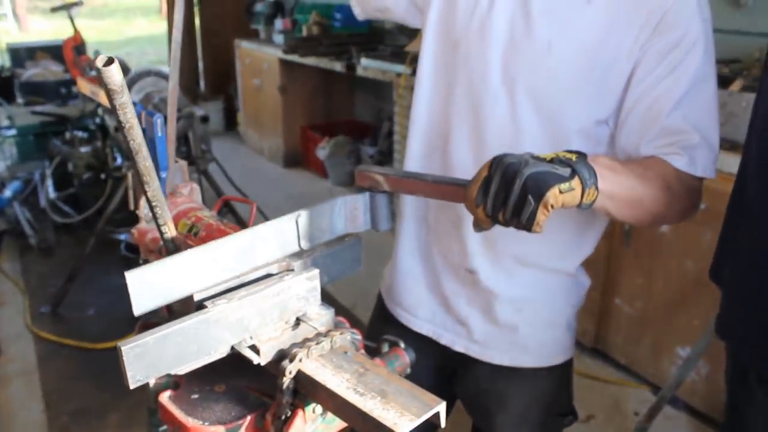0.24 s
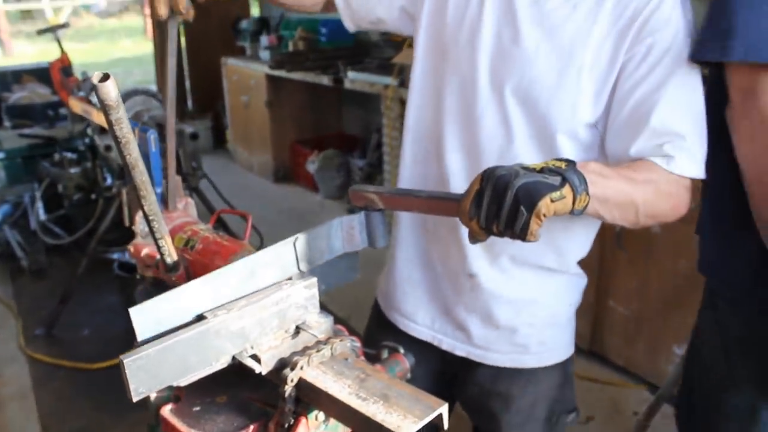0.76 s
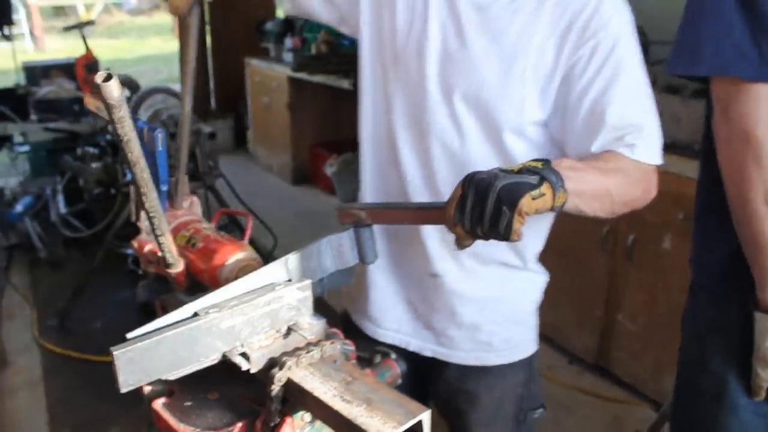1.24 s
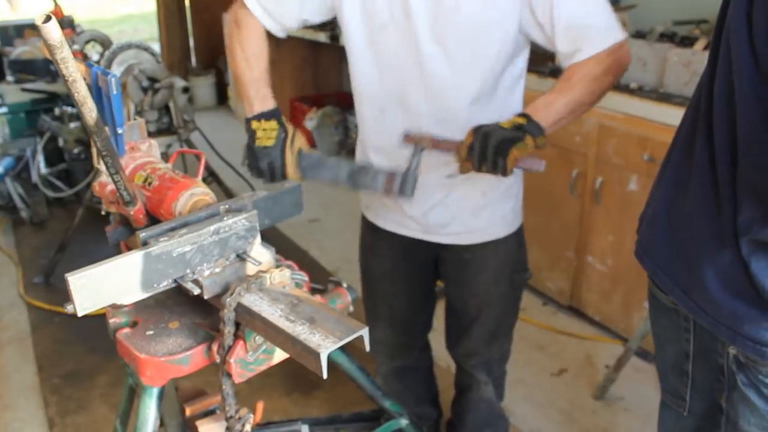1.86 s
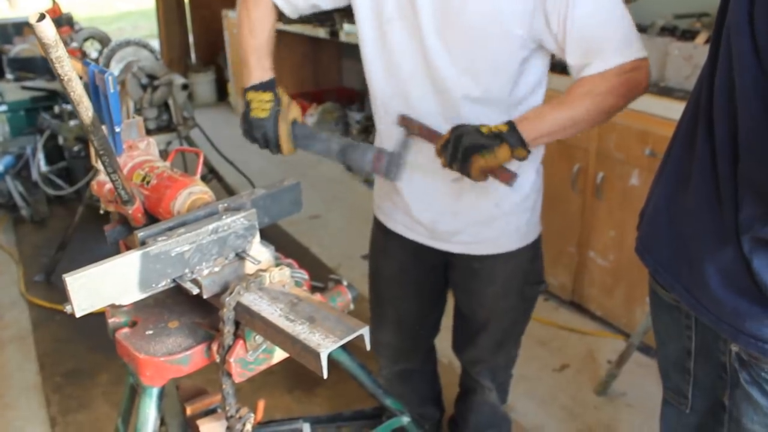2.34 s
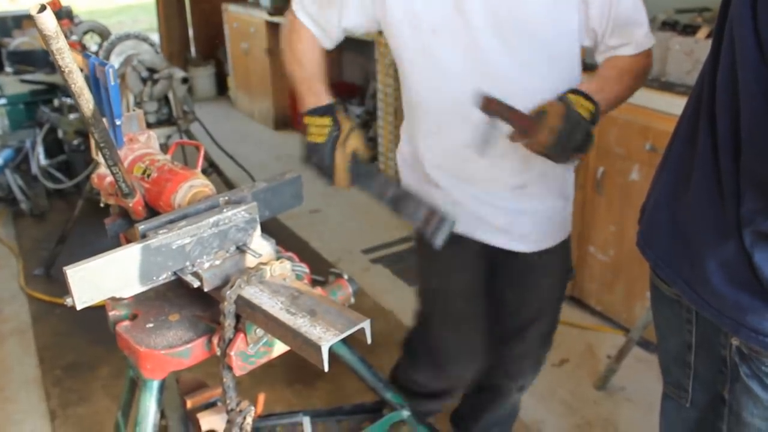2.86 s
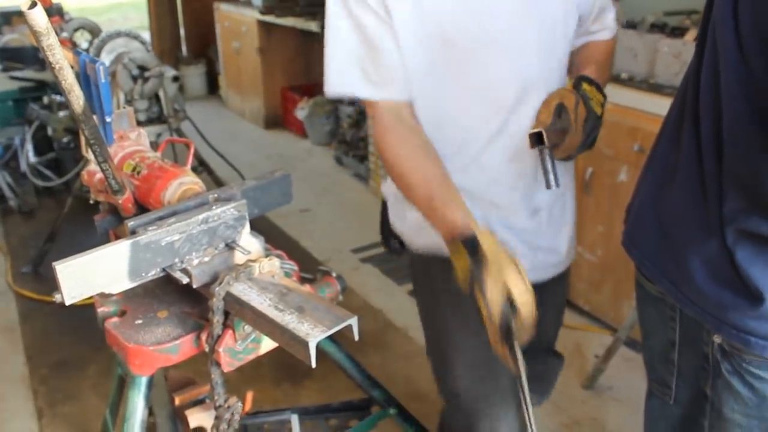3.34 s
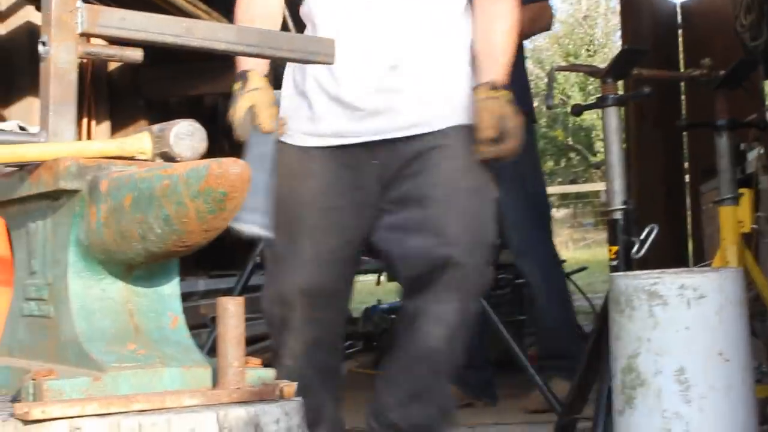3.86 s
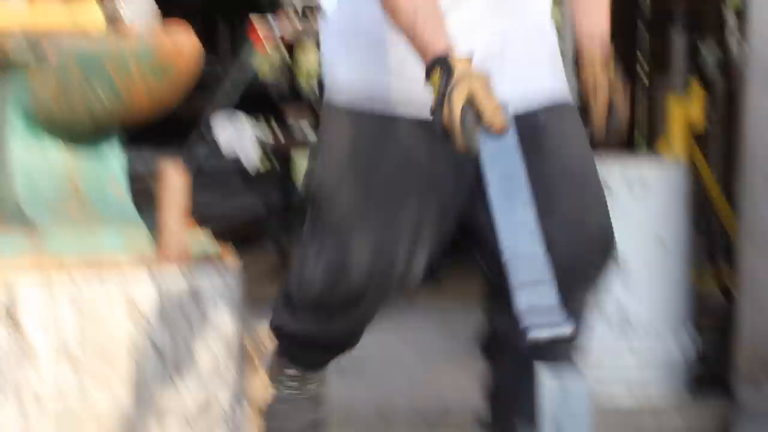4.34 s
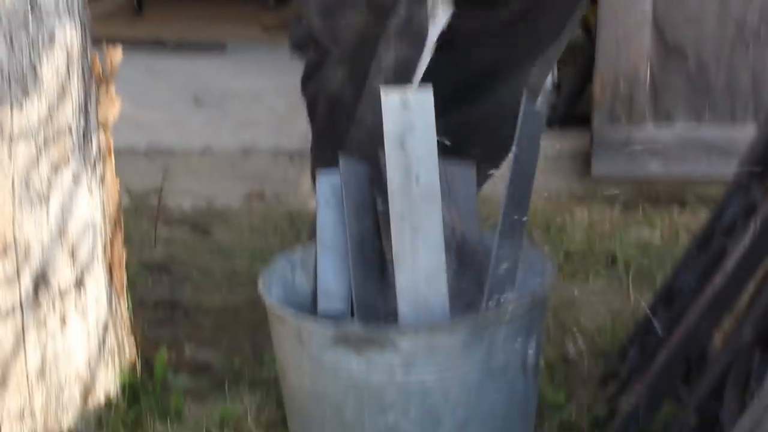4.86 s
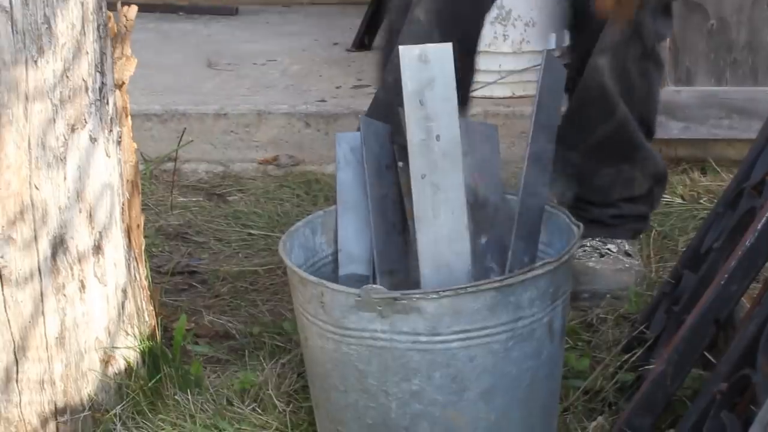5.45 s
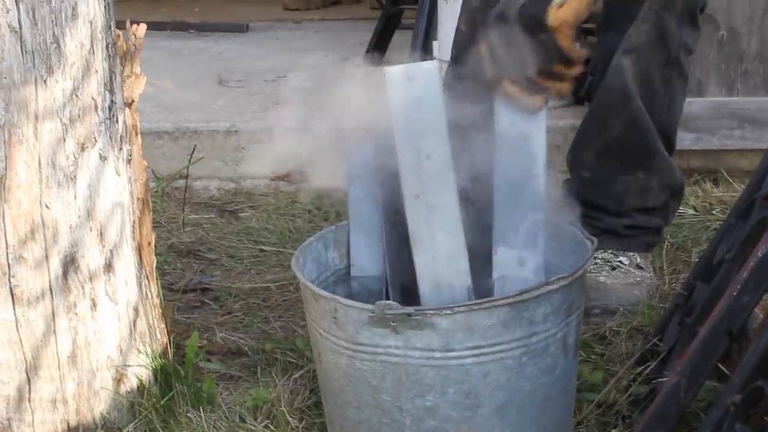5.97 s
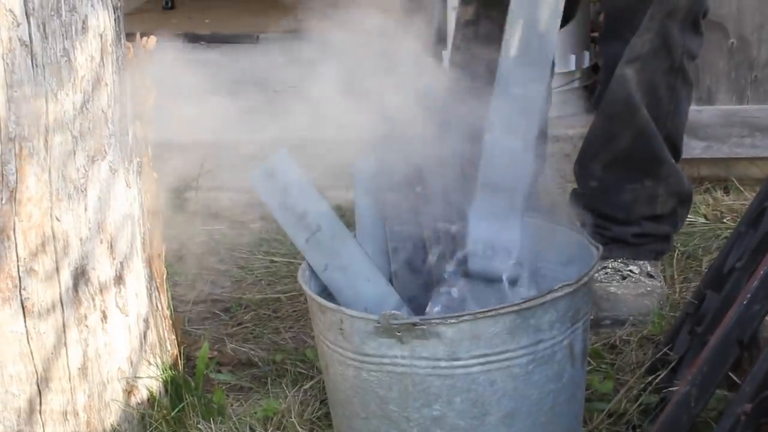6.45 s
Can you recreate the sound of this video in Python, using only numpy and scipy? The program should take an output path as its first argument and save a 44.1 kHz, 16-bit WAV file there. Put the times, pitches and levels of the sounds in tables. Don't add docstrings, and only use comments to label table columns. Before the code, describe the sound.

Loud steady burner roar stops dead, cloth and soles rustle, hot metal knocks into a bucket and boils fiercely, then a quiet yard with insects.

```python
import sys
import numpy as np
from scipy import signal
from scipy.fft import rfft, irfft
from scipy.io import wavfile

SR = 44100
rng = np.random.default_rng(int(sys.argv[2]) if len(sys.argv) > 2 else 0)


def wav_record(signal):
    frames = np.transpose(np.atleast_2d(signal))
    bounded = np.clip(frames, -1, 1)
    quanta = np.round(bounded * 32767).astype(np.int16)
    wavfile.write(sys.argv[1], SR, quanta)


def ratio_of_db(decibels):
    return 10 ** (np.asarray(decibels, float) / 20)


N = 295470
T = np.arange(N) / SR
HZ = np.maximum(np.arange(N // 2 + 1) * SR / N, 1)
FORGE_END_S, PLUNGE_S, QUENCH_END_S = 1.043, 2.162, 5.5135


def rms_one(x):
    return x / np.sqrt(np.mean(x ** 2) + 1e-20)


def white():
    return rng.standard_normal(N)


def high_pass(x, order, hz):
    return signal.sosfilt(signal.butter(order, hz, "high", fs=SR, output="sos"), x)


def drift(rate_hz):
    r = np.exp(-80 * np.pi * rate_hz / SR)
    slow = signal.lfilter([1], [1, -2 * r, r * r], rng.standard_normal(N // 40 + 2002))
    slow = rms_one(slow[2000:])
    return np.interp(np.arange(N) / 40, np.arange(len(slow)), slow)


def swells(rows):
    return sum(db * np.exp(-((T - s) / np.where(T < s, rise, fade)) ** 2) for s, db, rise, fade in rows)


def held(start, end, attack_s, release_s):
    return np.clip((T - start) / attack_s, 0, 1) * np.exp(-np.maximum(T - end, 0) / release_s)


def colour(x, spectrum=((1, 0), (2, 0)), peaks=(), lift_db=0., band=(1, 30000)):
    hz, db = np.transpose(spectrum)
    gain = ratio_of_db(np.interp(np.log(HZ), np.log(hz), db))
    humps = sum(ratio_of_db(2 * top_db) / (1 + (2 * (HZ - at) / width) ** 2) for at, width, top_db in peaks)
    edge_loss = (1 + (band[0] / HZ) ** 12) * (1 + (HZ / band[1]) ** 12)
    gain = gain * np.sqrt((1 + ratio_of_db(2 * lift_db) * humps) / edge_loss)
    return rms_one(irfft(rfft(x) * gain, N))


def grains(per_s, spread_db, low_hz, high_hz, cycles, noise):
    sizes = ratio_of_db(spread_db * np.minimum(rng.exponential(1, N), 5)) * rng.choice([-1, 1], N)
    born = rng.random(N) < per_s * ratio_of_db(3 * drift(15)) / SR
    dealt = rng.integers(0, 14, N)
    out = 0
    for k, hz in enumerate(np.geomspace(low_hz, high_hz, 14)):
        r, w = ratio_of_db(-60 * hz / (cycles * SR)), 2 * np.pi * hz / SR
        clicks = sizes * born * (dealt == k) + 1e-18
        out = out + hz * signal.lfilter([0, np.sin(w)], [1, -2 * r * np.cos(w), r * r], clicks)
    noise = np.clip(noise, 0, 1)
    share = 2 * (high_hz - low_hz) / SR
    return np.sqrt(1 - noise) * rms_one(out) + np.sqrt(noise / share) * white()


def burst(hz, width, t60, rise_s, glide=0., struck=0.):
    t = np.arange(int(max(.25, t60) * SR)) / SR
    r = np.exp(-np.pi * width / SR)
    wobble = signal.lfilter([1], [1, -2 * r, r * r], rng.standard_normal((2, len(t) + 400)))
    wobble = rms_one(wobble[:, 400:])
    turning = np.exp(2j * np.pi * hz * (t + glide * t * t / 2))
    wave = np.real((struck + wobble[0] + 1j * wobble[1]) * turning)
    wave *= (1 - np.exp(-t / rise_s)) ** 2 * ratio_of_db(-60 * t / t60)
    return wave / np.abs(wave).max()


def add(out, s, wave):
    i = round(s * SR)
    out[i:i + len(wave)] += wave[:N - i]


def echoes(x, t60, wet_db):
    t = np.arange(1, 4000) / SR
    tail = rng.standard_normal(len(t)) * ratio_of_db(-60 * t / t60) * (t > .003)
    response = np.append(1, ratio_of_db(wet_db) * tail / np.linalg.norm(tail))
    return signal.oaconvolve(x, response / np.linalg.norm(response))[:N]


def shifting_echoes(x, sway, t60, wet_db):
    one = echoes(x, t60, wet_db)
    other = echoes(np.roll(x, N // 2), t60, wet_db)
    return np.cos(sway) * one - np.sin(sway) * other


def yard():
    # f/Hz, level/dB per Hz
    yard_colour = [(18, -59.5), (30, -23), (59, -20), (117, -8.5), (173, -19.5), (333, -17), (400, -22),
                   (493, -23.5), (3160, -30.5), (4560, -35), (5480, -35), (15600, -37)]
    # t/s, peak level/dB, f/Hz, t60/s
    grass_steps = [(5.8, -37, 1340, 0.2), (5.946, -32.5, 3000, 0.3), (6.082, -37, 638, 0.077),
                   (6.246, -33, 1840, 0.12), (6.464, -35, 1570, 0.19), (6.671, -37, 592, .15)]
    out = ratio_of_db(-54.5 + 1.1 * drift(2.23)) * colour(
        white(), yard_colour, [(114.5, 22, 0.014)], lift_db=1.0, band=(1, 300))
    rustle = ratio_of_db(-58.5 + 3.5 * (T - QUENCH_END_S))
    out += rustle * colour(grains(600, 2.8, 285, 4000, 2.6, noise=0.83), yard_colour, band=(300, 3800))
    insects = ratio_of_db(-58.5 + 1.1 * 20 * np.log10(ratio_of_db(1)) + 1.1 * drift(4.4))
    out += insects * colour(white(), yard_colour, [(4570, 280, 0.005)], lift_db=6.5, band=(3800, 5400))
    for s, db, hz, t60 in grass_steps:
        add(out, s, ratio_of_db(db - 9.5) * burst(hz, 1.8 * hz, t60, rise_s=0.0026))
    return out + ratio_of_db(-57) * colour(white(), yard_colour, band=(5400, 30000))


def motor():
    # t/s, level/dB
    drone_course = [(1.05, -53), (1.5, -53), (1.9, -49), (2.13, -51), (2.25, -60), (2.47, -51),
                    (3.0, -46.5), (3.8, -49), (4.39, -50.5), (4.87, -50), (5.5, -49)]
    drone = colour(white(), peaks=[(74, 13, 0.012)], lift_db=25., band=(55, 110))
    return ratio_of_db(np.interp(T, *np.transpose(drone_course))) * drone


def walk():
    # f/Hz, level/dB per Hz
    walk_colour = [(53, -32), (90, 3), (109, 4), (161, -2.5), (218, -7), (321, -4), (382, -6), (464, -6.5),
                   (528, -3), (1250, 3), (4970, -13.5), (8900, -26), (11500, -21.5), (15600, -24)]
    # t/s, level/dB over the quiet, swell/s, fade/s
    footfalls = [(1.122, 7, 0.031, 0.062), (1.5, -1, 0.12, .1), (1.678, 4.5, 0.01, 0.064),
                 (1.738, 4, 0.014, .03), (2.034, 4, 0.045, 0.12)]
    # t/s, level/dB over the quiet, swell/s, fade/s
    brushes = [(1.122, 19, 0.047, 0.12), (1.42, 19, 0.19, 0.51), (1.55, 5, 0.053, 0.067),
               (1.75, 4.5, 0.035, 0.31), (2.03, 14.5, 0.032, 0.1), (2.12, 11, .02, 0.03)]
    # t/s, peak level/dB, f/Hz, t60/s
    ticks = [(1.08, -32, 2180, 0.02), (1.113, -27, 3420, 0.026), (1.3304, -34, 6150, 0.015),
             (1.4192, -41, 2180, 0.016), (1.474, -27, 11600, 0.01), (1.599, -26.5, 10600, 0.022),
             (1.674, -24.5, 164, 0.093), (1.105, -36, 151, .08), (1.0992, -33, 2200, .015),
             (1.1751, -31, 5500, .012), (1.7423, -31, 2090, .015), (1.9892, -35, 10100, .02),
             (2.1055, -33, 3380, .02), (1.118, -32, 242, 0.093), (1.7116, -26, 2200, 0.027),
             (1.755, -34, 2040, 0.017), (1.7623, -19, 10600, 0.0083), (1.8094, -31, 9300, 0.0067),
             (2.05, -31, 2240, 0.027)]
    feet, brush = swells(footfalls), swells(brushes)
    tread = ratio_of_db(-47 + feet)
    scuff = ratio_of_db(-46 + 0.17 * (feet + brush))
    cloth = ratio_of_db(-61 + 0.58 * brush + 0.92 * feet)
    grass = ratio_of_db(-63 + brush)
    out = tread * colour(grains(160, 1.2, 94, 680, 2.5, noise=0.29), walk_colour, band=(120, 520))
    out += scuff * colour(white(), walk_colour, band=(600, 3000)) * ratio_of_db(1.1 * drift(20))
    rustle = grains(1500, 1.7, 3200, 15000, 3.3, noise=0.5)
    out += cloth * colour(rustle, walk_colour, band=(3000, 8000))
    out += grass * colour(rustle, walk_colour, band=(8000, 30000))
    for s, db, hz, t60 in ticks:
        add(out, s, ratio_of_db(db) * burst(hz, 0.73 * hz, t60, rise_s=0.00025))
    return high_pass(out, 2, 110)


def forge():
    # f/Hz, level/dB per Hz
    roar_colour = [(18, -70), (30, -41.5), (92, -26), (134, -13), (207, -11.5), (253, -5), (424, -14),
                   (497, -8), (740, -9), (1060, -5), (1150, -11.5), (1740, -6.5), (3500, -12.5),
                   (4550, -43), (7700, -120)]
    # f/Hz, width/Hz, level/dB
    firebox = [(260, 37, -3.5), (307, 30, -9), (352, 24, 3), (486, 19, 4), (585, 24, -4), (626, 60, 0),
               (822, 18, 0.5), (1090, 13, 5), (1274, 50, -3), (1688, 45, 0), (2100, 27, -9),
               (2300, 37, 0.5), (2500, 72, -0.5), (2990, 35, 5)]
    # f/Hz, level/dB per Hz
    jet_colour = [(1470, -45), (2500, 7), (2720, 1), (2910, -5.5), (3900, -2.5), (4760, -7), (11800, 1),
                  (15600, -1)]
    # f/Hz, width/Hz, level/dB
    nozzle = [(3260, 40, 3), (3990, 40, 4), (4410, 40, 2), (4890, 35, 4), (5720, 40, 3), (6000, 35, 3),
              (10510, 70, 2), (11770, 70, 4), (11940, 40, 3), (12290, 50, 4), (12480, 50, 4),
              (12860, 70, 4), (14500, 50, 2)]
    flame = colour(white(), roar_colour, firebox, lift_db=8.5, band=(1, 3100))
    gas = colour(white(), jet_colour, nozzle, lift_db=-2.5, band=(3100, 30000))
    flame = ratio_of_db(0.7 * drift(14)) * shifting_echoes(flame, .7 * drift(1.5), t60=0.1, wet_db=-11.)
    gas = ratio_of_db(0.36 * drift(30)) * shifting_echoes(gas, 1.5 * drift(1.5), t60=.05, wet_db=-6.)
    return ratio_of_db(-23.5) * flame + ratio_of_db(-16) * gas


def bucket(x):
    bar_held = [(163, 44, -12), (1020, 245, 1.5), (1570, 280, -2), (2250, 92, -3), (2920, 140, -5.5),
                (3510, 140, -3), (4440, 920, -5), (8050, 400, -9), (13700, 6900, -4.5)]
    bar_pushed = [(1000, 230, -0.5), (2800, 200, -2.5), (3560, 340, -4), (4670, 420, -5), (5600, 740, -5),
                  (12000, 3600, -5)]
    bar_stirred = [(304, 62, 1.5), (1105, 290, 1), (1820, 110, -3.5), (2630, 420, -4), (3660, 370, 0),
                   (4800, 270, -4), (6820, 320, -6)]
    push_s, stir_s = 3.7, 4.45
    pushed, stirred = (np.clip((T - s) / .3 + .5, 0, 1) for s in (push_s, stir_s))
    stages = (1 - pushed, bar_held), (pushed - stirred, bar_pushed), (stirred, bar_stirred)
    rung = sum(share * colour(x, peaks=peaks, lift_db=8.) for share, peaks in stages)
    rung *= np.sqrt(np.mean(x ** 2))
    phase = T / .35 % 4
    shares = [np.clip(1 - np.abs((phase - k + 2) % 4 - 2), 0, 1) for k in range(4)]
    return sum(np.sqrt(share) * echoes(rung, t60=.045, wet_db=-6.) for share in shares)


def boil():
    # f/Hz, level/dB per Hz
    boil_colour = [(53, -31.5), (90, -1.5), (390, -9), (601, -4), (830, -8), (986, -3.5), (1550, -1.5),
                   (2010, 1), (2240, 0.5), (6440, -3), (11800, -4), (15600, -7)]
    # t/s, steam pressure level/dB, churning of the water/dB re normal
    boil_course = [(2.327, -32, 2.5), (2.42, -29.5, -0.5), (2.56, -26.5, -2), (2.95, -26, 2),
                   (3.3, -24.5, 0.5), (3.7, -21, -0.5), (3.87, -22.5, 0), (3.97, -22, -9),
                   (4.09, -23.5, -8.5), (4.15, -24, 0), (4.3, -28, 2), (4.53, -26, 2), (4.62, -26, 6.5),
                   (4.76, -28.5, 5.5), (4.86, -26, 2.5), (5.2, -26.5, 2.5), (5.37, -29.5, 7),
                   (5.51, -28.5, 6.5)]
    # t/s, level/dB, swell/s, fade/s
    sloshes = [(3.105, 1.5, 0.025, 0.33), (3.43, 8, 0.0076, 0.027), (3.745, 11, 0.0078, 0.042),
               (4.238, 12.5, 0.019, 0.027), (4.265, 11.5, 0.0083, 0.04), (4.56, 2.5, 0.013, 0.022),
               (4.603, 6, 0.0044, 0.013)]
    # t/s, level/dB, swell/s, fade/s
    lulls = [(3.49, -3.5, 0.045, 0.19), (3.78, -7.5, 0.024, 0.06), (3.753, -2.5, 0.0042, 0.017),
             (4.31, -3, .015, 0.031), (4.39, -2.5, .01, .03), (4.68, -10, 0.058, 0.035),
             (4.728, -8, 0.036, 0.02), (4.99, -4, 0.013, 0.0088), (4.915, -1.5, 0.014, 0.011),
             (5.025, -4, 0.02, 0.014), (5.1, -4.5, 0.0075, 0.023), (5.214, -8, 0.01, 0.0096),
             (5.3, -4, 0.022, 0.032), (5.376, -8, 0.0075, 0.025), (5.432, -10.5, 0.03, 0.013),
             (5.488, -9, 0.027, 0.017)]
    # level/dB, attack/s, hold/s, fall/dB per s
    splash = [
        (-35.5, 0.0079, 0.11, 84),
        (-28, 0.0043, 0.07, 195),
        (-18, 0.0034, 0.048, 282),
        (-22.5, 0.00198, 0.011, 201),
    ]
    # t/s, peak level/dB, f/Hz, t60/s
    spits = [(2.235, -15, 4220, 0.087), (4.3617, -9.5, 4120, 0.025), (4.4507, -12, 4570, 0.034),
             (4.754, -20, 1380, 0.1), (4.8007, -14, 3600, 0.07), (4.9314, -12, 1694, 0.061),
             (4.9558, -11, 2540, 0.032), (5.0376, -11, 3740, 0.25), (5.054, -8, 3430, 0.038),
             (5.1488, -18, 1850, 0.07), (5.234, -15.5, 980, 0.064), (5.264, -9, 2310, 0.025),
             (5.3345, -14, 3390, 0.033), (5.447, -9, 2814, 0.079), (5.4992, -13, 1486, 0.086)]
    s, *controls = np.transpose(boil_course)
    pressure, churn = (np.interp(T, s, c) for c in controls)
    churn, lull = churn + swells(sloshes), swells(lulls)
    boiling = [pressure - 13.5 + churn + 0.5 * lull,
               pressure - 10 + churn + 0.5 * lull,
               pressure - 4 + 0.38 * churn + lull,
               pressure + lull]
    gains = []
    for (db, attack, hold, fall), later in zip(splash, boiling):
        dying = db - fall * np.maximum(T - PLUNGE_S - hold, 0)
        gains.append(ratio_of_db(np.where(T < s[0], dying, later)) * held(PLUNGE_S, N, attack, 1))
    gurgle, bubbles, fizz, steam = gains
    out = gurgle * colour(grains(330, 0.78, 162, 750, 4.4, noise=0.92), boil_colour, band=(100, 750))
    out = high_pass(out, 1, 130)
    out += bubbles * colour(grains(700, 0.77, 643, 2300, 4.7, noise=0.44), boil_colour, band=(750, 2200))
    out += fizz * colour(grains(1800, 2.7, 2200, 7400, 10.4, noise=0.5), boil_colour, band=(2200, 6000))
    hiss = colour(grains(4300, 0.79, 4500, 15040, 5.8, noise=0.48), boil_colour, band=(6000, 30000))
    out += steam * hiss * ratio_of_db(.55 * drift(25))
    out = bucket(out)
    for s, db, hz, t60 in spits:
        add(out, s, ratio_of_db(db - 4.5) * burst(hz, .42 * hz, t60, rise_s=.006, glide=8.))
    return out


def cavities():
    # t/s, peak level/dB, start f/Hz, rise of pitch/per s
    # (negative falls), t60/s
    pockets = [(2.163, -12, 1970, -3, .063), (2.163, -10, 12000, -1, .04), (2.186, -24, 8310, 1., .063),
               (2.196, -24, 13000, 2, .076), (2.201, -26, 12100, 2, .073), (2.208, -11, 3200, -1.5, 0.11),
               (2.236, -23, 7000, 4, 0.078), (2.238, -25, 4500, -1, .06), (2.262, -23, 1098, -0.5, .11),
               (2.298, -31, 4040, 27, 0.16), (2.301, -29, 11000, 3., 0.08), (2.303, -32, 13500, 0., .05),
               (2.335, -23.5, 3400, -2, .052), (2.851, -22.5, 1596, 1, 0.6), (3.101, -22, 3100, 0, .6),
               (3.4178, -13, 3030, 0., .03), (3.744, -11.5, 900, 0.5, 0.1), (3.925, -19.5, 3700, 0.5, 0.42),
               (4.436, -18.5, 3030, 20.5, 0.14), (4.001, -15, 5600, -1.5, .3),
               (4.214, -20, 3300, 9.5, 0.067), (4.2295, -18.5, 309, -1, .043),
               (4.2632, -9.5, 1607, 0.5, 0.039), (4.586, -8.5, 2950, 0, .05), (4.602, -20, 600, 1, .03),
               (4.638, -26, 10700, 2.5, 0.038), (4.701, -32, 8700, 0., .06), (4.79, -24, 2330, 5, 0.11),
               (4.819, -22.5, 1323, 6., .06), (4.835, -22, 3740, 2, 0.14), (4.932, -21, 1585, 28., .11),
               (5.04, -22, 2310, 19.5, 0.087), (5.047, -22, 1156, 0, .069), (5.15, -22, 2500, 5.5, 0.11),
               (5.186, -21, 4920, -2.5, .05), (5.232, -18.5, 3330, 2, .06), (5.247, -23, 1164, 45.5, .12),
               (5.28, -22, 6100, 1.2, .03)]
    # t/s, peak level/dB, f/Hz, t60/s
    whistles = [(2.54, -27, 2250, .3), (2.659, -25, 4470, .45), (2.761, -22, 4400, .4),
                (2.87, -24, 4450, .4), (2.98, -20, 4400, .2), (3.09, -21, 4400, .45),
                (3.1, -22.5, 1710, .3), (3.2, -22, 3390, .3), (4.76, -25, 1200, .4),
                (4.79, -24.5, 3650, 0.47), (4.88, -26.5, 1202, 0.42), (5.14, -22.5, 3660, .4),
                (5.31, -25.5, 3650, .3), (5.0, -24, 1150, .4), (3.29, -31, 1507, .3),
                (3.56, -26.5, 1000, .3), (4.12, -29, 960, .3)]
    out = np.zeros(N)
    for s, db, hz, glide, t60 in pockets:
        width = hz * (.12 + .012 * abs(glide))
        ring = .7 / (1 + abs(glide))
        add(out, s, ratio_of_db(db) * burst(hz, width, t60, rise_s=.045 * t60, glide=glide, struck=ring))
    for s, db, hz, t60 in whistles:
        add(out, s, ratio_of_db(db) * burst(hz, 0.096 * hz, t60, rise_s=0.036 * t60))
    return out


def knock(wall_hz, bar_hz, bar_db):
    t60 = 0.085
    wall = burst(wall_hz, 290, 0.26 * t60, rise_s=0.00092, struck=3.5)
    wall += 0.46 * burst(960, 390, 1.8 * t60, rise_s=0.00018, struck=0.36)
    thud = 0.29 * burst(371, 405, .5 * t60, rise_s=0.00017, struck=0.77)
    crack = burst(3485, 8700, 0.018, rise_s=0.00024) + 0.4 * burst(8230, 14000, 0.011, rise_s=0.00025)
    bar = ratio_of_db(bar_db) * (burst(bar_hz, 630, 0.25 * t60, rise_s=0.0005, struck=2.5) + 0.6 * crack)
    return wall + thud + bar + 1.2 * crack


def bars():
    # t/s, peak level/dB, wall f/Hz, bar f/Hz, bar level/dB re wall
    knocks = [(2.191, 0, 1090, 4570, -5), (2.1999, -2, 1220, 2100, -1), (2.21, -14, 1020, 3070, 13),
              (2.329, -16.5, 1720, 5860, 8), (2.316, -28, 1200, 6000, -8), (2.638, -17.5, 1570, 8200, 14.5),
              (3.4174, 1, 1000, 2960, 3), (3.428, 0, 1250, 2200, -25), (3.4344, -6, 1440, 2330, -16),
              (3.683, -4.5, 1180, 3480, 2), (3.7412, 9.5, 1770, 3540, -2),
              (4.0306, -25.5, 1040, 3530, 26.5), (4.23, -11.5, 1020, 2680, 15),
              (4.261, 1.5, 2010, 3900, -3.5), (4.599, 0.5, 1540, 3330, 6), (4.639, -4.5, 1805, 3830, 4)]
    # t/s, peak level/dB, centre f/Hz, t60/s
    snaps = [(2.164, -18, 350, .02), (2.1635, -5, 5520, 0.044), (3.4178, -10.5, 1492, 0.055),
             (3.428, -14, 1302, 0.089), (2.191, -19, 8800, .03), (2.238, -26, 8950, .03),
             (2.258, -30, 12000, .02), (3.7308, -16, 5060, .09), (3.7413, -6, 4520, .03),
             (3.7417, -8, 807, 0.044), (4.261, -7, 3510, 0.032), (4.5995, -10, 686, 0.043),
             (4.6003, -6, 2500, 0.022), (4.616, -20, 890, .05), (5.042, -16, 3720, .015),
             (5.2676, -21, 2500, .015)]
    # f/Hz, width/Hz, level/dB
    plunge_ring = [(2900, 400, -9), (4490, 90, 6), (4760, 110, -3.5), (6160, 50, 1), (6770, 40, 2),
                   (7550, 40, -5), (8310, 55, -2), (9100, 45, -8), (9530, 45, -13), (10600, 40, -2.5),
                   (12100, 72, -2), (13000, 45, -1), (13200, 50, -4), (14600, 40, -5)]
    # start t/s, end t/s, level/dB at the end, rise/dB per s
    slides = [
        (4.54, 4.579, -17.5, 21),
        (4.574, 4.6, -13.5, 120),
    ]
    # f/Hz, width/Hz, level/dB
    squeal_slow = [(1900, 82, -13), (2820, 89, -15), (3770, 32, -11), (4580, 50, -3), (8700, 80, -16),
                   (10600, 61, -18)]
    squeal_fast = [(3900, 180, -8), (4924, 35, 5.5), (7380, 140, -9), (7920, 130, -4), (8550, 93, -6),
                   (10600, 130, -10), (11600, 250, -27)]
    out = np.zeros(N)
    for s, db, wall_hz, bar_hz, bar_db in knocks:
        add(out, s, ratio_of_db(db - 14.0) * knock(wall_hz, bar_hz, bar_db))
    for s, db, hz, fade in snaps:
        add(out, s, ratio_of_db(db) * burst(hz, 2.5 * hz, fade, rise_s=0.00035))
    shock = held(PLUNGE_S, PLUNGE_S + .053, 0.0014, .006)
    shock *= ratio_of_db(-17 - 84 * np.maximum(T - PLUNGE_S, 0))
    out += shock * colour(white(), peaks=plunge_ring, lift_db=34.0, band=(1700, 16000))
    for (start, end, db, rise), peaks in zip(slides, (squeal_slow, squeal_fast)):
        gain = held(start, end, .003, 0.002) * ratio_of_db(db - rise * np.abs(end - T))
        out += gain * colour(white(), peaks=peaks, lift_db=25.5, band=(1500, 12000))
    return high_pass(out, 3, 240)


def scene():
    plunged = T >= PLUNGE_S
    quench = walk() * ~plunged + boil() * plunged + motor() + bars()
    mix = np.select([T < FORGE_END_S, T < QUENCH_END_S], [forge(), quench], yard())
    mix += cavities() * (T < QUENCH_END_S)
    return np.tile(mix, (2, 1))


def top_cut(x):
    return signal.sosfilt(signal.butter(12, 16360, fs=SR, output="sos"), x)


def record(dry):
    dry = high_pass(dry, 2, 38)
    dry = signal.sosfilt(signal.ellip(10, .5, 70, 15800, fs=SR, output="sos"), dry)
    return top_cut(np.clip(dry, -1.06, 1.06))


dry = scene()
out = record(dry)
wav_record(out)
```